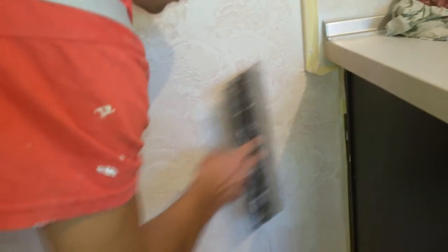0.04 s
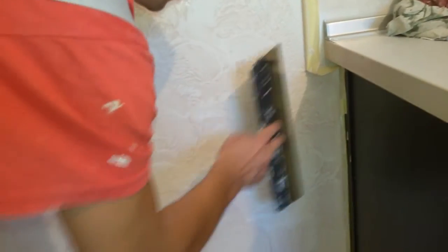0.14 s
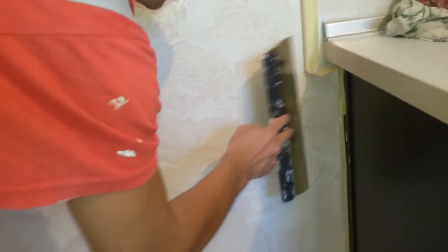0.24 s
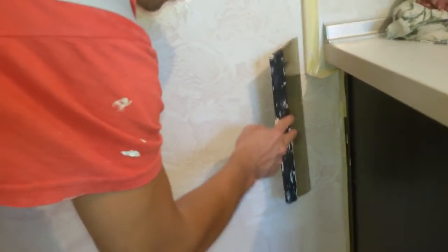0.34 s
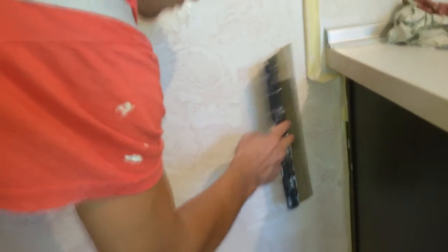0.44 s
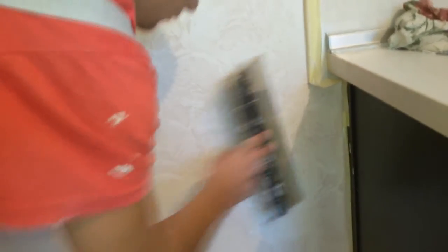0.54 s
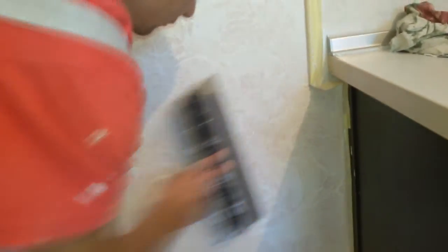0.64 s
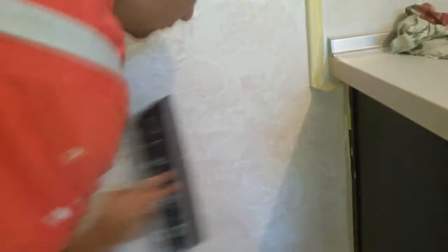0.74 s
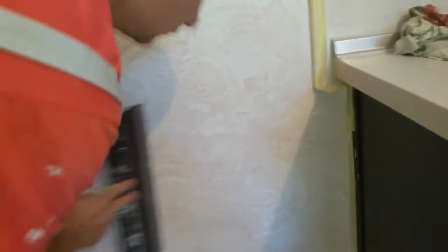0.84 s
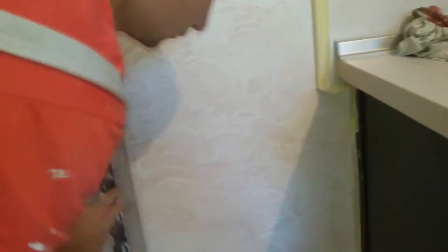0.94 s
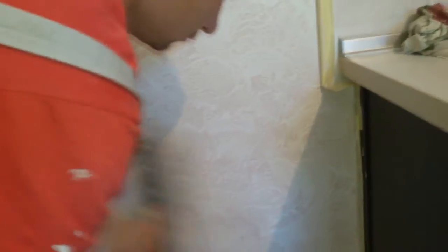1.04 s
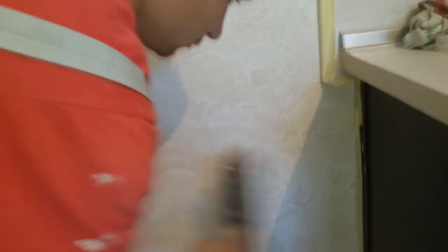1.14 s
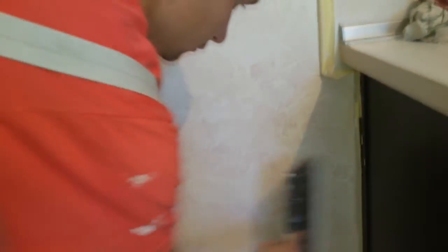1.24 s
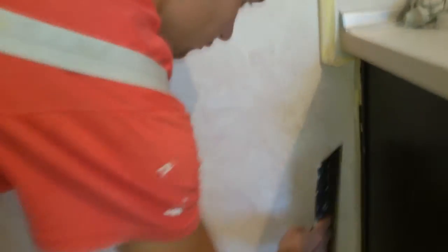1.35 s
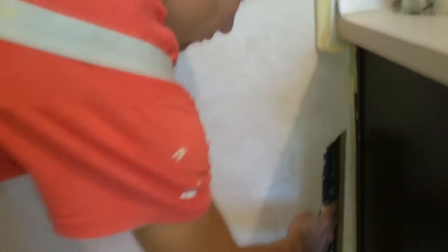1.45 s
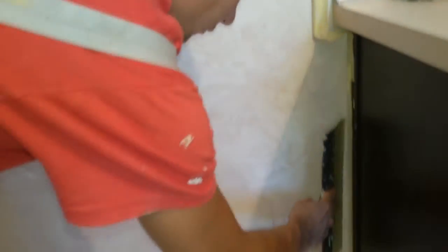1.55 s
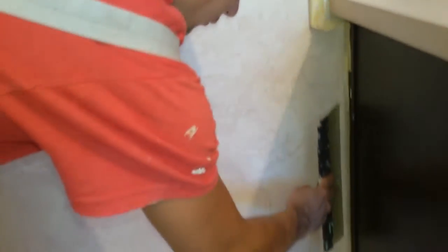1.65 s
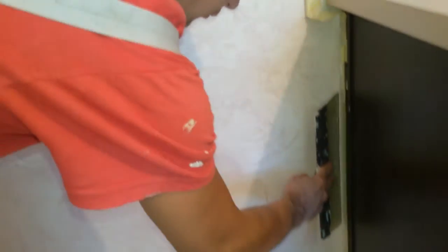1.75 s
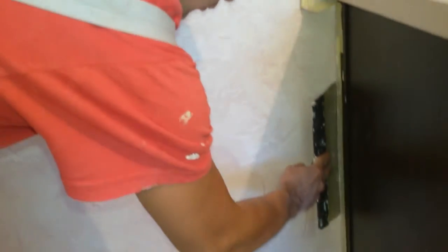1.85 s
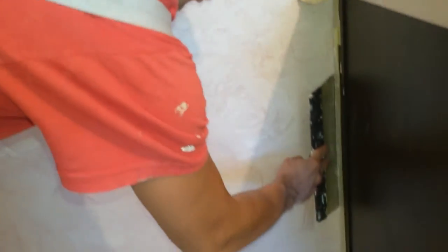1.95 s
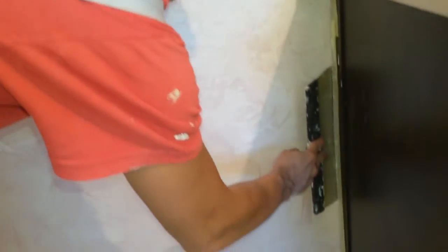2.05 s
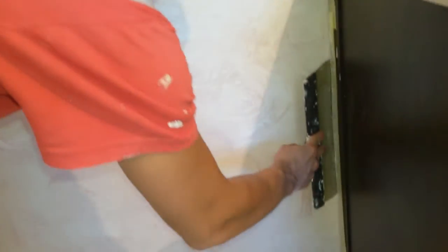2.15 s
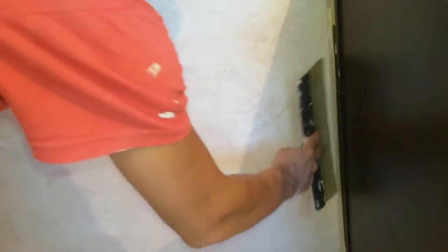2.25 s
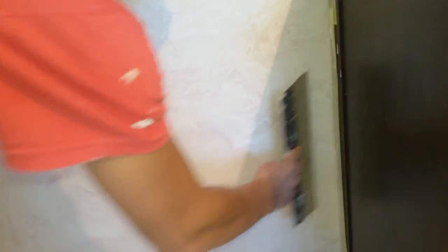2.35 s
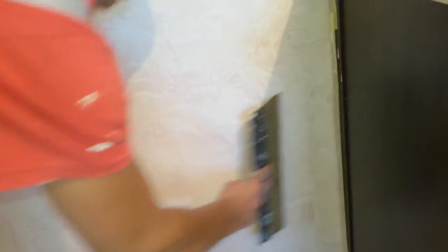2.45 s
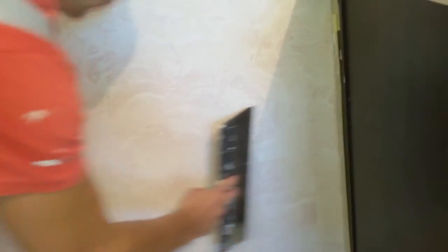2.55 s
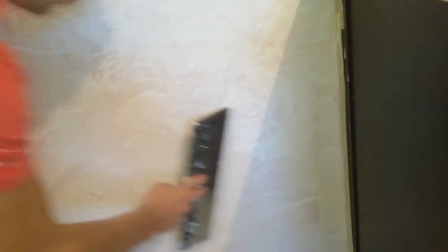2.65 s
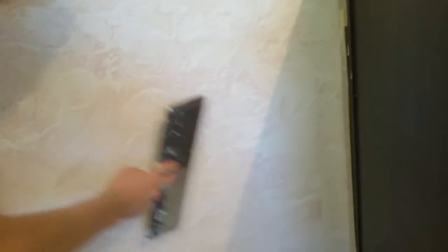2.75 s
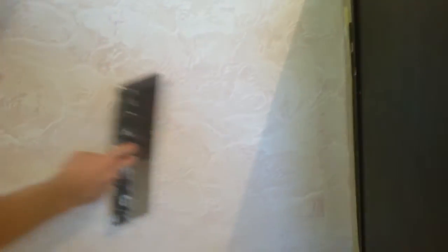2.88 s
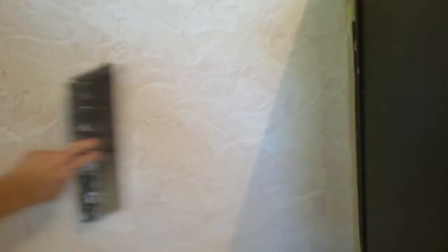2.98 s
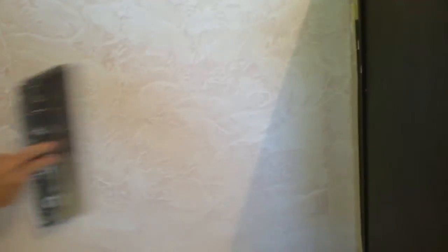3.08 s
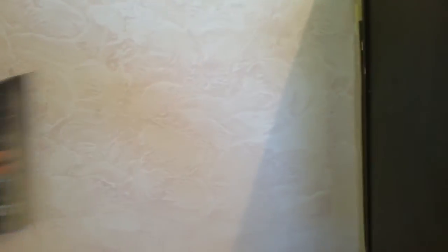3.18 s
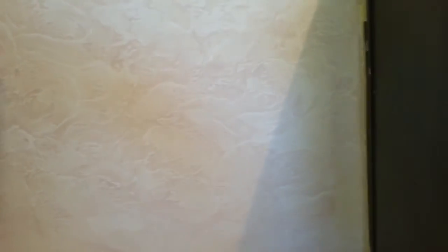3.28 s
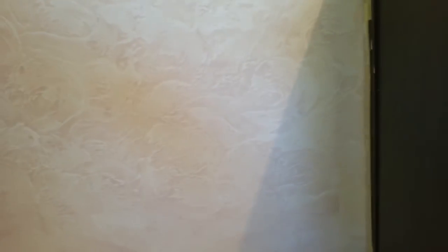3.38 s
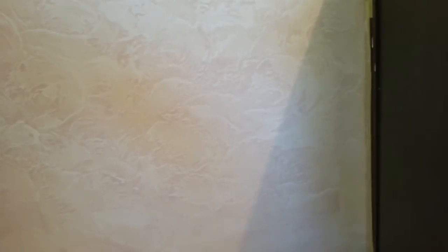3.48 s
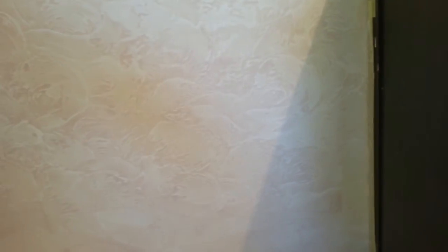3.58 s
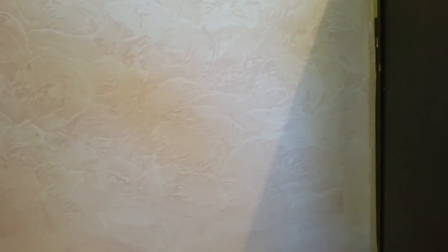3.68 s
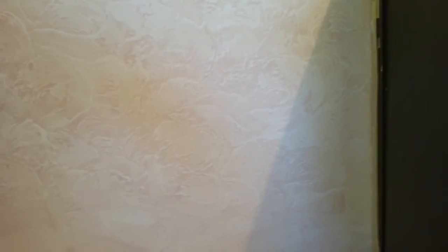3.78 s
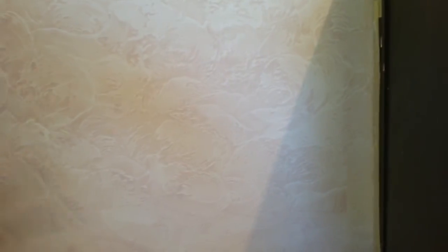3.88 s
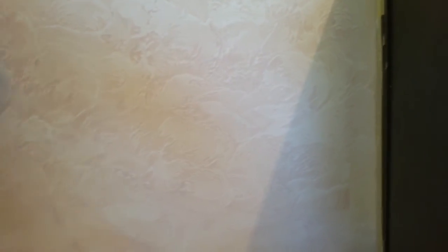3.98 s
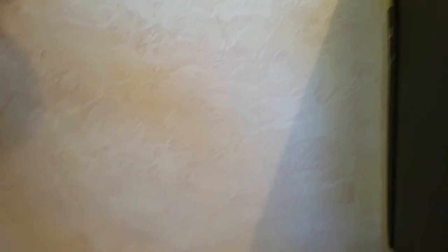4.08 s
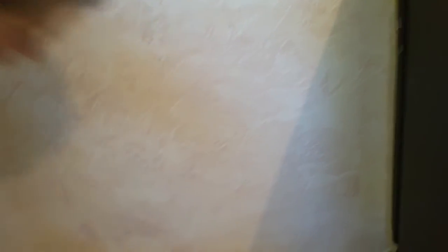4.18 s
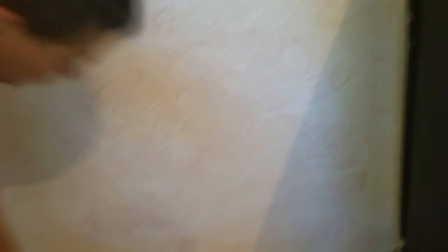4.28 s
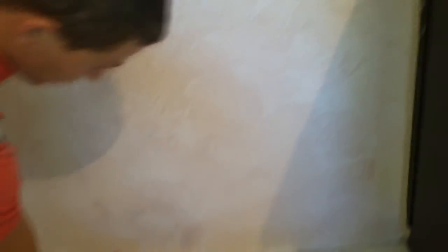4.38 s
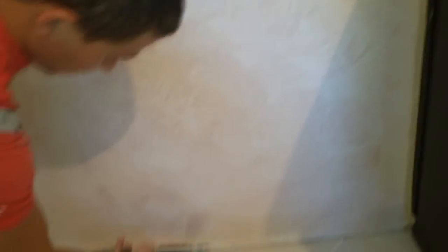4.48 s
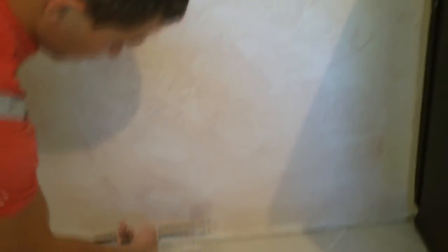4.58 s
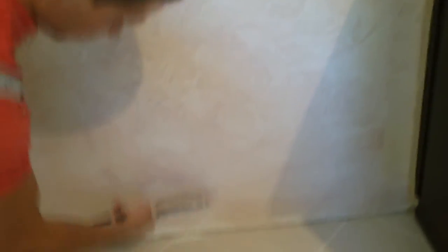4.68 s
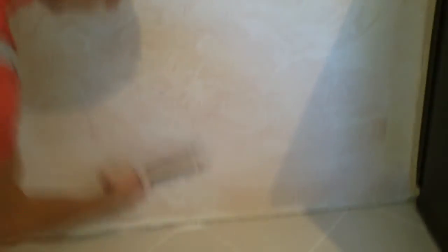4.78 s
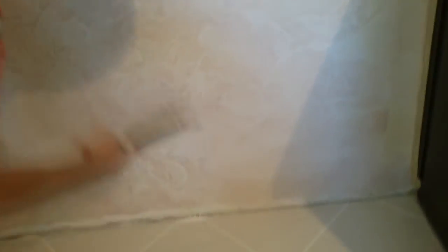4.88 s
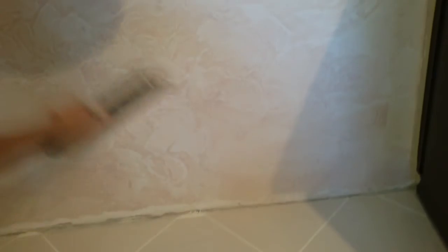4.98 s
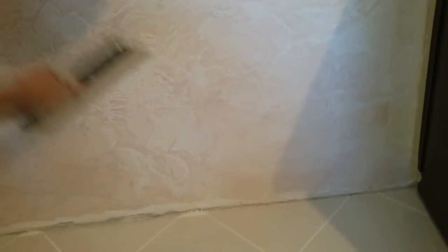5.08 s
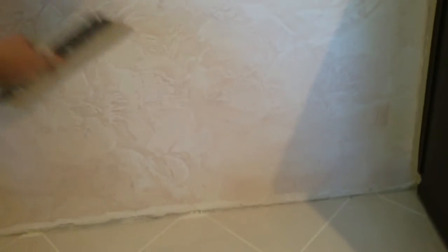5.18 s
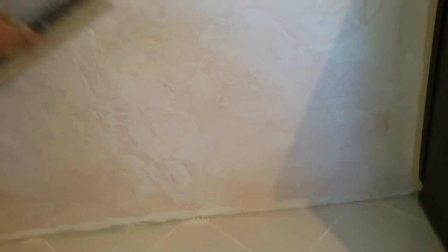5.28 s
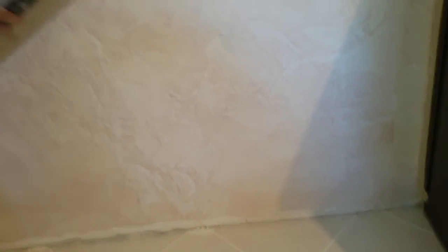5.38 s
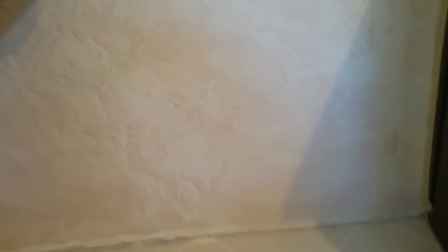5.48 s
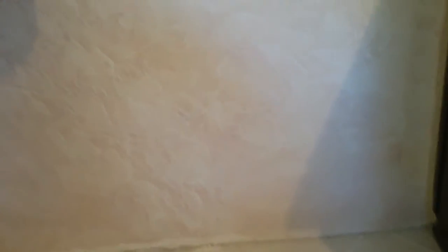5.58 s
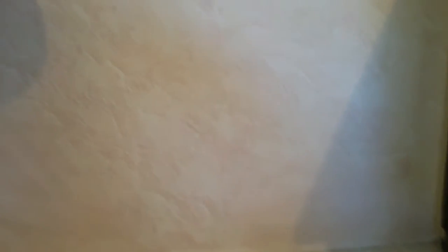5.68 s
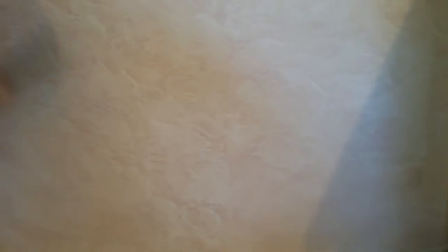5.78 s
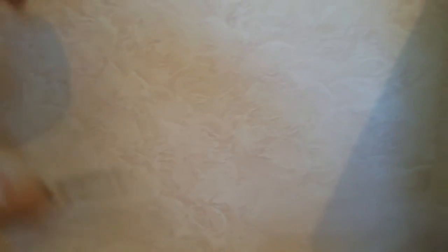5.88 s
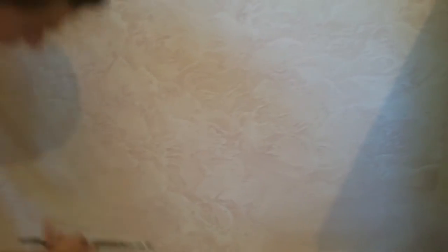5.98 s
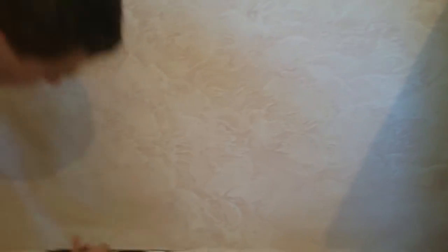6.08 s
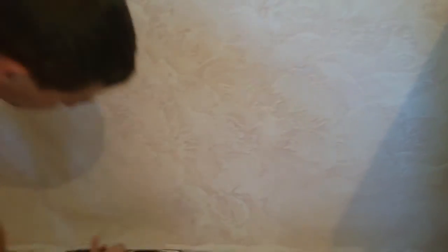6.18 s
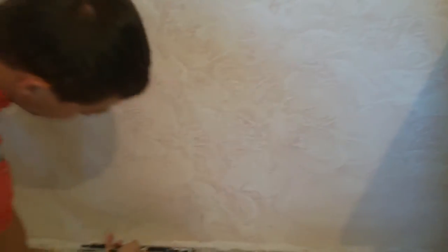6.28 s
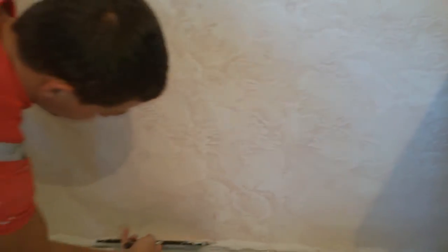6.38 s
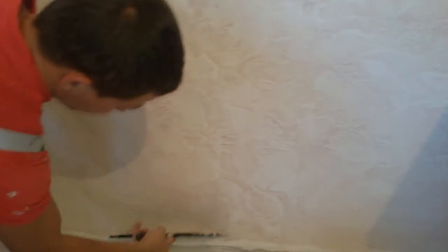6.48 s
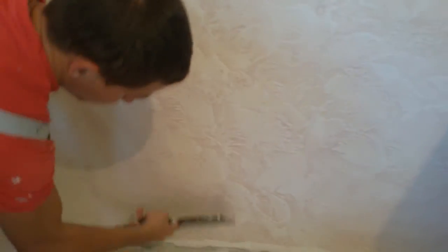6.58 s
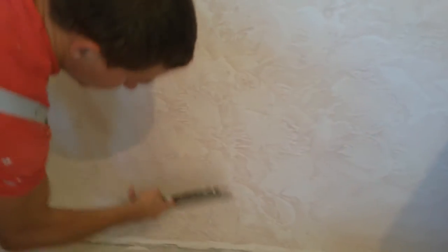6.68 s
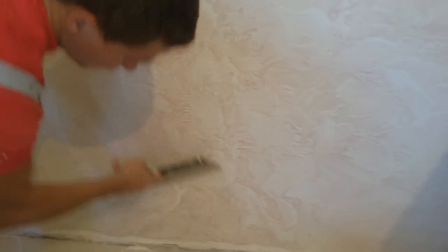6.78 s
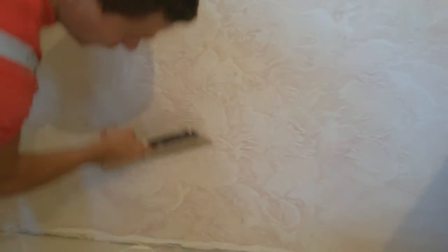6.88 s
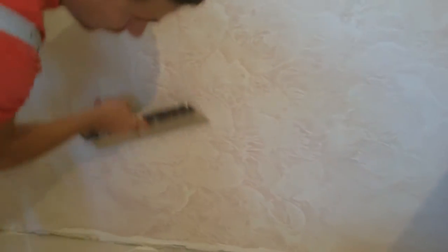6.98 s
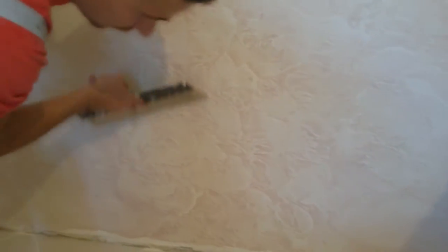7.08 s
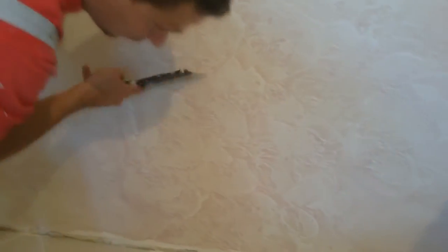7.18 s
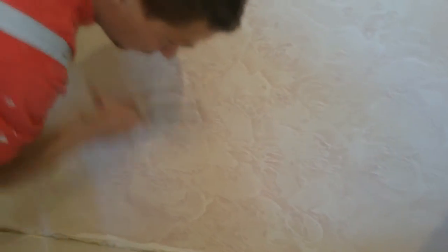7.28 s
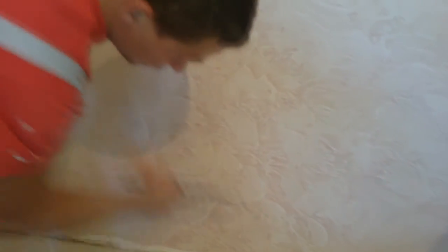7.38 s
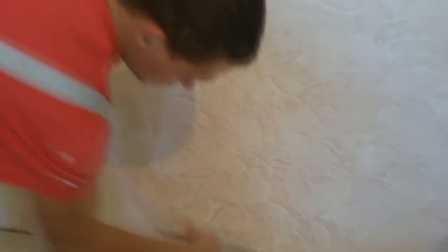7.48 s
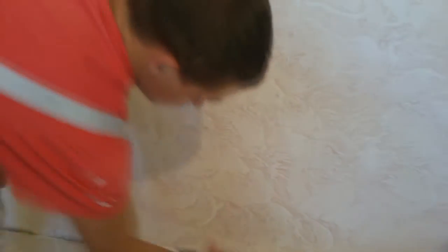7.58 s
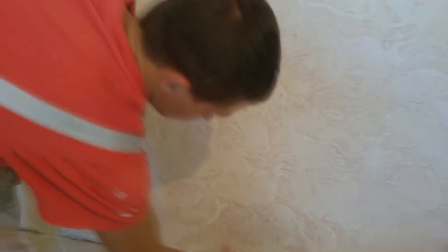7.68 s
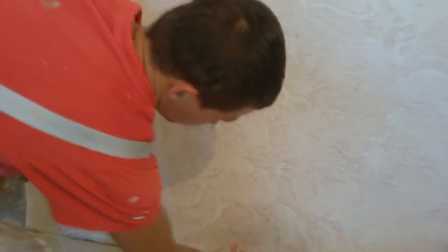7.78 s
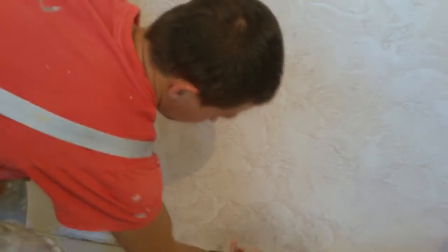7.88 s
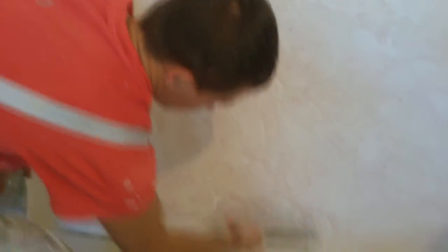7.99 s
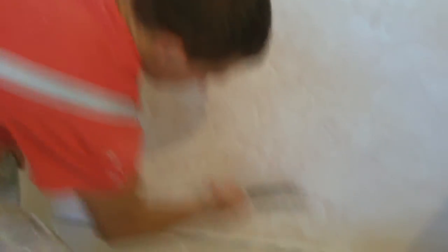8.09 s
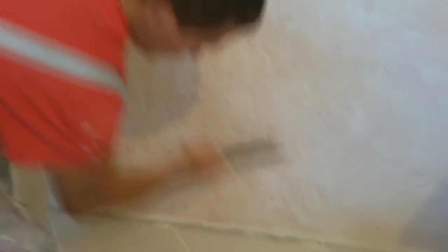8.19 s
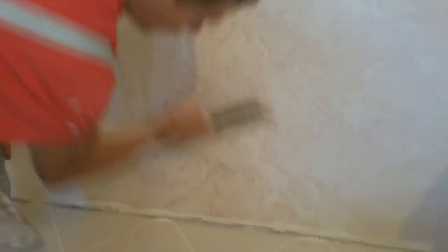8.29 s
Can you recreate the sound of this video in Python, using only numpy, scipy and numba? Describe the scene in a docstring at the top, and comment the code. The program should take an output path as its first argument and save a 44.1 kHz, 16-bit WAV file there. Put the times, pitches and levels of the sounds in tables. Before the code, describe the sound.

Close up in a bare tiled room, a steel trowel skims a plaster wall. The tail of one stroke rings off, then a tap and a short scrape, a pause, a long rasp, another pause, and three more progressively shorter strokes. Each has gritty hiss and a thin metallic ring, with room echo after the lift. Faint brushes and dull thuds fill the gaps.

```python
"""Trowel skimming a wall

A steel trowel skims wax off plaster in long strokes in a bare tiled room, heard in mono from close by.
Strokes: grit clicks drive a rasp, two steel resonances, the flexing plate and the wall.
Taps of the landing blade, bites as strokes set off and light brushes between are enveloped noise and grit.
A synthetic room rings on after every lift; soft thuds and a faint bed of rumble and hiss are added dry."""
import sys
import numpy as np
from scipy import signal
from scipy.fft import rfft, irfft
from scipy.io import wavfile
from numba import njit

SR = 44100
rng = np.random.default_rng(int(sys.argv[2]) if len(sys.argv) > 2 else 0)


def inscribe(sig):
    """Save sig as 16-bit PCM at rate SR to the path in sys.argv[1].

    A 1-D sig is mono; a 2-D sig holds one channel per row.
    Samples are clipped to [-1, 1] before scaling.
    """
    pcm = np.round(np.clip(np.atleast_2d(sig).T, -1, 1) * 32767)
    wavfile.write(sys.argv[1], SR, pcm.astype(np.int16))


N = 367765
LEAD = SR // 2  # samples computed before time zero: work is already under way, the room already ringing
TIME = np.arange(-LEAD, N) / SR
M = len(TIME)


def scraping():
    """Edge lands, bears down, eases off, flicks away; grit drives steel, flexing plate and wall behind."""
    # grit spectra: f/Hz, relative density/dB
    rasp_shape = [(90, -71), (400, -43), (800, -7), (1100, 0), (1450, -1), (2200, -5), (3100, 1.5),
                  (4000, 2.5), (5000, 2), (6100, 2), (7200, -6), (9000, -11), (14000, -38.5)]
    sizzle_shape = [(4000, -37.5), (7000, 3.5), (8500, 0), (10500, -0.5), (12500, -2.5), (14500, -21)]
    wall_shape = [(70, -46.5), (150, -34), (185, -15), (225, -1), (330, -1.5), (450, 1.5), (700, -4),
                  (1100, -3), (2000, -30)]
    # arm pressure changes: t/s, 1/e half-width/s, friction/dB, drumming of plate and wall/dB
    pushes = [(0.76, 0.043, 1.5, 3.5), (2.47, 0.1, -1, -4.5), (2.75, 0.062, 2, 5.5), (3.22, 0.29, 3, 0),
              (3.52, 0.17, 1, 9.5), (4.99, 0.097, 0.5, 5.5), (6.83, 0.054, 0, 6.5), (7.075, 0.034, 1, 4),
              (8.29, 0.059, 5.5, 4.5)]
    (start, length, press_s, body_delay_s, ease_s, level_db, ease_db, flick_db, ring_db, flex_db, wall_db,
     sizzle_db, steel_hz, steel_bend, upper_hz, flex_hz, flex_bend) = current_stroke()

    # gesture phases, each 0..1
    land_s, lift_s, body_rise_s, press_curve = 0.01, 0.021, 0.025, 1.75
    age = np.maximum(TIME - start, 0)
    contact = (1 - np.exp(-age / land_s)) * np.exp(-np.maximum(age - length, 0) / lift_s)
    loose = np.clip(1 - age / press_s, 0, 1) ** press_curve
    body = (1 + np.tanh((age - body_delay_s) / body_rise_s)) / 2
    speed = np.sin(np.pi * np.minimum(age / length, 1)) ** 2
    eased = np.sin(np.pi / 2 * np.clip(1 + (age - length) / ease_s, 0, 1))

    # first touch is weak; the loose blade rings more freely
    touch_db, touch_ring_db, touch_flex_db, touch_sizzle_db = -29, 6, 14, 4.5
    # letting off: change on top of the friction
    ease_ring_db, ease_flex_db, ease_wall_db, ease_sizzle_db = -1, -9, 6, -2
    early_body_db, push_wall_share = -12, 0.94  # low body of the scrape comes in late
    flick_lead_s, flick_width_s, flick_sizzle_power = 0.028, 0.048, 1.5  # peaks just before the lift
    push_db = sum(db * bump(TIME - s, width) for s, width, db, _ in pushes)
    drum_db = sum(db * bump(TIME - s, width) for s, width, _, db in pushes)
    friction = contact * undb(level_db + touch_db * loose + push_db + ease_db * eased)
    flick = undb(flick_db * bump(age - length + flick_lead_s, flick_width_s))
    ring_gain = undb(ring_db + touch_ring_db * loose + ease_ring_db * eased)
    flex_gain = undb(flex_db + touch_flex_db * loose + drum_db + ease_flex_db * eased)
    wall_gain = undb(wall_db + early_body_db * (1 - body) + push_wall_share * drum_db + ease_wall_db * eased)
    sizzle_gain = undb(sizzle_db + touch_sizzle_db * loose + ease_sizzle_db * eased)
    sizzle_gain = sizzle_gain * flick ** flick_sizzle_power

    # plaster ridges and quick stick-slip shake the whole edge at once
    texture = unit(undb(1.1 * walk(35) + 0.077 * walk(600)))
    rasp = colour(grit(rate=9000, spread_db=2.5), rasp_shape)
    sizzle = sizzle_gain * colour(grit(rate=7700, spread_db=-3.5), sizzle_shape)

    # contact point wanders along the edge: upper against lower steel resonance
    upper_db, upper_speed_db, wander_db = -10.5, 6.5, 3
    favour = undb(upper_db + upper_speed_db * speed + wander_db * walk(19))
    bend = steel_bend ** eased
    lower = mode(grit(rate=5000, spread_db=2.5), steel_hz * bend, damping=0.38, skirt=1.0)
    upper = mode(grit(rate=4600, spread_db=-1.5), upper_hz * bend, damping=0.34, skirt=0.64)
    ring = undb(-1.5) * ring_gain * (lower + favour * upper) / np.hypot(1, favour)

    plate_hz = flex_hz * flex_bend ** eased
    plate = mode(grit(rate=4000, spread_db=1.0), plate_hz, damping=0.57, skirt=0.44)
    flex = undb(-5.5) * flex_gain * plate
    wall = undb(-1.5) * wall_gain * colour(grit(rate=4000, spread_db=3.0), wall_shape)
    singing = undb(-13.5) * after_ring(friction * ring_gain, hz=2090, t60=0.57)
    return friction * texture * (flick * (rasp + sizzle) + ring + flex + wall) + singing


def current_stroke():
    """Each column of the stroke under way, per sample."""
    # press: time to bear down; body delay: until the low body comes in; ease: last part, hand lets off;
    # flick: swell as the blade turns away; bend: pitch at lift over pitch before easing.
    # Ring, flex, wall, sizzle are relative to friction, before the part trims in scraping().
    # start/s, length/s, press/s, body delay/s, ease/s, friction/dB, ease/dB, flick/dB, ring/dB, flex/dB,
    # wall/dB, sizzle/dB, steel f/Hz, steel bend/ratio, upper f/Hz, flex f/Hz, flex bend/ratio
    strokes = [ (-0.45, 0.46, 0.33, 0.44, 0.26, -18.5, -8, 2, 7, -1, -10, -12, 2150, 1.0, 2600, 435, 1.0),
               (0.564, 0.46, 0.17, 0.41, 0.16, -21.5, 0.5, -2, 3.5, -11, -18.5, -6.5, 2300, 0.98, 2470, 451.3, 1.1),
               (2.322, 1.418, 0.14, 0.32, 0.44, -24, -6, 3, 5.5, -11.5, -19, -9, 2230, 0.89, 2883, 526, 0.78),
               (4.663, 1.043, 0.23, 0.22, 0.53, -19.5, -4, 2, 1, -11.5, -17.5, -9.5, 1980, 0.98, 2960, 506, 0.83),
               (6.583, 0.7, 0.27, 0.065, 0.33, -20.5, -5, 6.5, 2.1, -5, -18.5, -13.5, 1930, 1.2, 2890, 709, 1.24),
               (8.013, 0.34, 0.14, 0.29, 0.042, -23.5, -17, 1, 0.7, -7.5, -4, -8.5, 2087, 1.1, 2703, 770, 1.2),
               ]
    rows = np.array(strokes)
    return rows[np.maximum(np.searchsorted(rows[:, 0], TIME) - 1, 0)].T


def after_ring(drive, hz, t60):
    """Lightly damped steel modes, as one noise band: stored energy sings on after the lift."""
    keep = np.exp(-2 * np.log(1000) / (t60 * SR))
    stored = signal.lfilter([1 - keep], [1, -keep], drive ** 2)
    return np.sqrt(stored) * mode(rng.standard_normal(M), hz, damping=0.3, skirt=0.42)


def biting():
    """Edge catches on the plaster as a stroke sets off: a short rasp through a steel resonance."""
    # t/s, level/dB
    bites = [(2.319, -45.5), (2.341, -39), (4.686, -36), (6.582, -32.5), (8.037, -32.5)]
    grip = sum(undb(db) * swell(s, rise=0.004, fall=0.022) for s, db in bites)
    return grip * mode(grit(rate=5000, spread_db=2.5), 2450, damping=0.42, skirt=0.8)


def tapping():
    """Blade meets the wall: short clack, steel ring and low plate note, all damped by the hand."""
    # t/s, level/dB, steel ring/dB re level, plate flex/dB re level; before the part trims below
    taps = [(0.522, -29.5, -9, -17.5), (1.901, -54, -1.5, -12), (1.921, -47, -5, -17.5),
            (1.943, -50.5, -7, -20), (4.621, -41.5, -9, -19), (4.634, -31, -18, -25),
            (6.493, -35, -14.5, -15), (7.952, -37, -2, -18.5), (7.956, -42, -4.5, -14)]
    # clack spectrum: f/Hz, relative density/dB
    clack_shape = [(100, -43), (300, -5.5), (1100, -2), (1900, 4), (2700, 2), (3800, -4.5), (6500, -4.5),
                   (14000, -23)]
    clack_env = sum(undb(db) * burst(s, 0.006) for s, db, _, _ in taps)
    ring_env = sum(undb(db + ring_db) * burst(s, 0.0029) for s, db, ring_db, _ in taps)
    plate_env = sum(undb(db + flex_db) * burst(s, 0.0092) for s, db, _, flex_db in taps)
    ring = mode(rng.standard_normal(M), 2350, damping=0.55, skirt=0.7)
    note = mode(rng.standard_normal(M), 470, damping=0.3, skirt=0.88)
    clack = colour(rng.standard_normal(M), clack_shape)
    return undb(-4.5) * clack_env * clack + ring_env * ring + undb(4) * plate_env * note


def brushing():
    """Barely loaded edge whispers over the wax between strokes: faint swells of filtered grit."""
    # peak t/s, level/dB, rise time constant/s, fall time constant/s
    brushes = [(1.775, -55.5, 0.008, 0.032), (1.865, -68.5, 0.017, 0.018), (1.952, -72, 0.011, 0.0053),
               (2.04, -60, 0.006, 0.012), (2.158, -51.5, 0.024, 0.0087), (4.06, -54.5, 0.049, 0.032),
               (4.26, -64, 0.1, 0.15)]
    # f/Hz, relative density/dB
    whisper_shape = [(200, -38), (600, -6), (1200, -3), (2100, 1), (3800, -1.5), (6300, 1), (8500, -6.5),
                     (13500, -12)]
    touch = sum(undb(db) * swell(s, rise, fall) for s, db, rise, fall in brushes)
    return touch * colour(grit(rate=5000, spread_db=3), whisper_shape)


def knocking():
    """Worker shifts and leans: soft, dull thuds, each a short decaying low sine."""
    # t/s, level/dB before trim
    knocks = [(0.022, -41.5), (1.777, -53), (1.835, -55), (2.405, -56), (3.52, -49), (3.615, -48.5),
              (3.67, -52.5), (5.511, -53.5)]
    thud_hz, decay_s, attack_s, trim_db = 112, 0.02, 0.0025, 5.0
    out = 0
    for s, db in knocks:
        envelope = burst(s, decay_s) - burst(s, attack_s)
        out = out + undb(db + trim_db) * envelope * np.sin(2 * np.pi * thud_hz * (TIME - s))
    return out


def room(x, wet_db, count):
    """Moving trowel cycles through spots on the wall, each ringing the room in its own way."""
    spots_per_s = 70
    place = TIME * spots_per_s % count
    out = 0
    for spot in range(count):
        distance = np.abs(place - spot)
        share = np.maximum(1 - np.minimum(distance, count - distance), 0)
        response = room_response(wet_db)
        # direct sound adds in amplitude, unrelated echoes in power
        direct = response[0] * share * x
        echoes = signal.fftconvolve(np.sqrt(share) * x, np.append(0, response[1:]))[:M]
        out = out + direct + echoes
    return out


def room_response(wet_db):
    """One spot: direct sound, two first echoes, diffuse noise tail decaying per band; unit energy."""
    # f/Hz, t60/s
    decays = [(100, 0.09), (220, 0.81), (450, 0.69), (1000, 0.6), (2500, 0.53), (6000, 0.55), (12000, 0.42)]
    # off floor and side wall: mean delay/s (varied per spot), level/dB re direct
    first_echoes = [(0.0056, -15.5), (0.0136, -3)]
    t = np.arange(SR) / SR
    hz = np.fft.rfftfreq(SR, 1 / SR)
    noise = rfft(rng.standard_normal(SR))
    centres = np.transpose(decays)[0]
    tail = 0
    for share, (_, t60) in zip(np.eye(len(decays)), decays):
        band = irfft(noise * on_log_axis(hz, np.column_stack([centres, share])), SR)
        tail = tail + band * np.exp(-np.log(1000) * t / t60)
    tail = tail * (1 - np.exp(-t / 0.019))  # gradual build-up
    response = undb(wet_db) * tail / np.linalg.norm(tail)
    response[0] += 1
    for delay, db in first_echoes:
        varied_delay = delay * SR * np.exp(0.15 * rng.standard_normal())
        response[int(varied_delay)] += undb(db)
    return response / np.linalg.norm(response)


def air():
    """Faint house rumble and hiss: filtered noise, wavering a little."""
    # f/Hz, relative density/dB
    air_shape = [(25, -6), (45, -13), (100, -5.5), (160, -13), (215, -7.5), (350, -20), (620, -17),
                 (1200, -20), (3000, -25), (6000, -25), (10500, -29), (14000, -23.5)]
    level_db = -68
    return undb(level_db + 0.28 * walk(15)) * colour(rng.standard_normal(M), air_shape)


def grit(rate, spread_db):
    """Random-sign clicks, rate per s, as grains caught by the edge; a few far larger (smaller if spread < 0)."""
    caught = rng.random(M) < rate / SR
    sizes = undb(spread_db * np.minimum(rng.exponential(size=M), 6))
    return unit(caught * sizes * rng.choice([-1, 1], M))


def mode(x, hz, damping, skirt):
    """Resonance at fixed or moving pitch, rms one; a second band-pass of width skirt steepens the sides."""
    centre = hz * np.ones(M)
    return unit(resonate(resonate(x, centre, float(damping)), centre, float(skirt)))


@njit
def resonate(x, hz, damping):
    """State-variable band-pass, centre moving per sample; damping = width over centre."""
    y, band, low = np.empty(len(x)), 0., 0.
    for i in range(len(x)):
        g = np.tan(np.pi * hz[i] / SR)
        v = (band + g * (x[i] - low)) / (1 + g * (g + damping))
        band, low, y[i] = 2 * v - band, low + 2 * g * v, damping * v
    return y


def colour(x, points):
    """Minimum-phase filter of unit energy with the given (f/Hz, dB) shape."""
    size = 4096
    cepstrum = irfft(np.log(undb(on_log_axis(np.fft.rfftfreq(size, 1 / SR), points))))
    # fold to the causal half
    cepstrum[1:size // 2] *= 2
    cepstrum[size // 2 + 1:] = 0
    response = irfft(np.exp(rfft(cepstrum)))
    return signal.oaconvolve(x, response / np.linalg.norm(response))[:len(x)]


def on_log_axis(hz, points):
    """Interpolate (f/Hz, value) points along log frequency."""
    f, value = np.transpose(points)
    return np.interp(np.log(np.maximum(hz, 1)), np.log(f), value)


def walk(rate):
    """Smooth random signal of rms one, with rate knots per s."""
    knots = rng.standard_normal(M // 10)
    return unit(np.interp((TIME - TIME[0]) * rate, np.arange(len(knots)), knots))


def burst(start, decay):
    """Envelope: jumps to one at start, decays exponentially."""
    age = TIME - start
    return (age >= 0) * np.exp(-np.clip(age / decay, 0, 50))


def swell(peak, rise, fall):
    """Envelope: grows exponentially to one at peak, then decays."""
    before = np.maximum(peak - TIME, 0) / rise
    after = np.maximum(TIME - peak, 0) / fall
    return np.exp(-np.minimum(before + after, 50))


def bump(offset, width):
    """Bell, one at zero offset, 1/e at width."""
    return np.exp(-(offset / width) ** 2)


def undb(db):
    """Decibels to gain."""
    return 10 ** (np.asarray(db) / 20)


def unit(x):
    """Scale to rms one."""
    return x / np.sqrt(np.mean(x ** 2))


def scene():
    """Trowel through the room, plus dry knocks and air; same signal in both channels."""
    trowel = scraping() + biting() + brushing() + tapping()
    mono = room(trowel, wet_db=-2.0, count=14) + knocking() + air()
    return np.tile(mono[LEAD:], (2, 1))


def record(dry):
    """Recorder cuts the top: steep elliptic low-pass."""
    top_hz = 14400
    return signal.sosfilt(signal.ellip(10, 0.2, 80, top_hz, fs=SR, output="sos"), dry)


dry = scene()
out = record(dry)
inscribe(out)
```